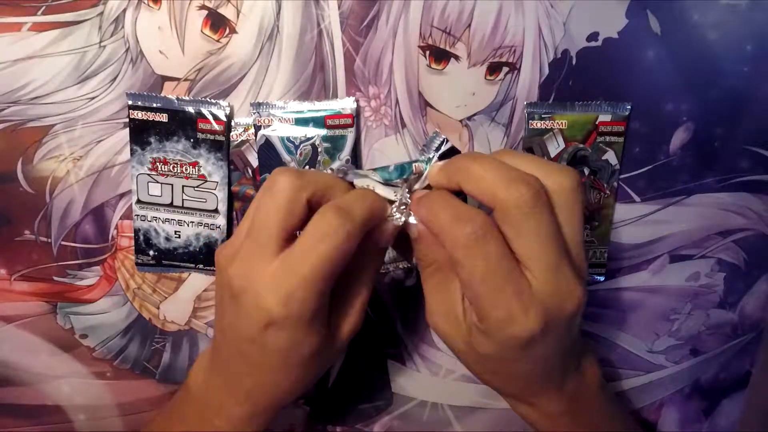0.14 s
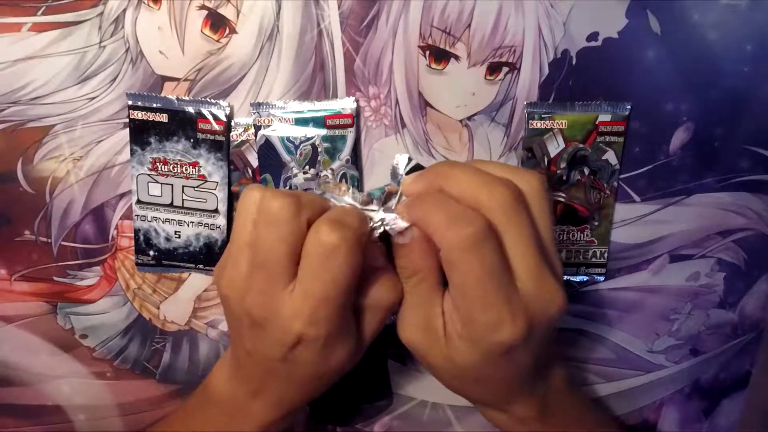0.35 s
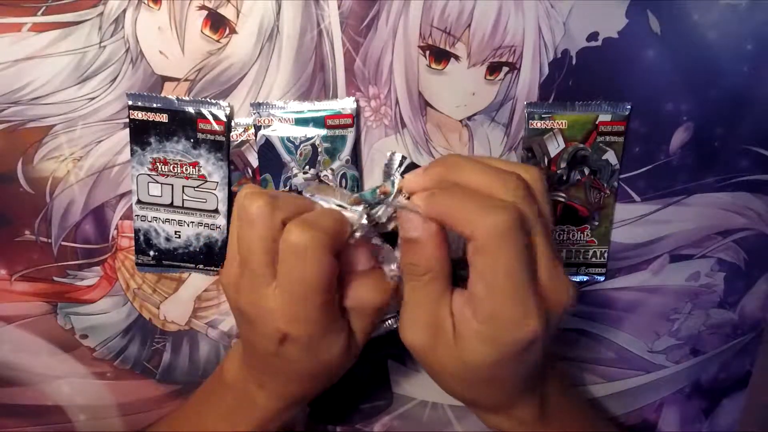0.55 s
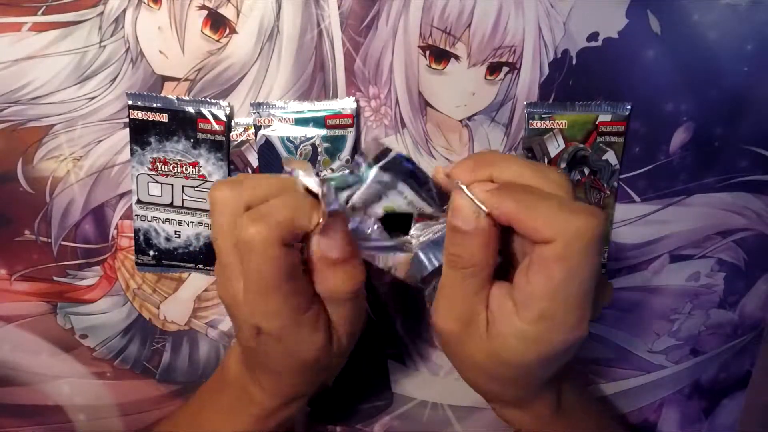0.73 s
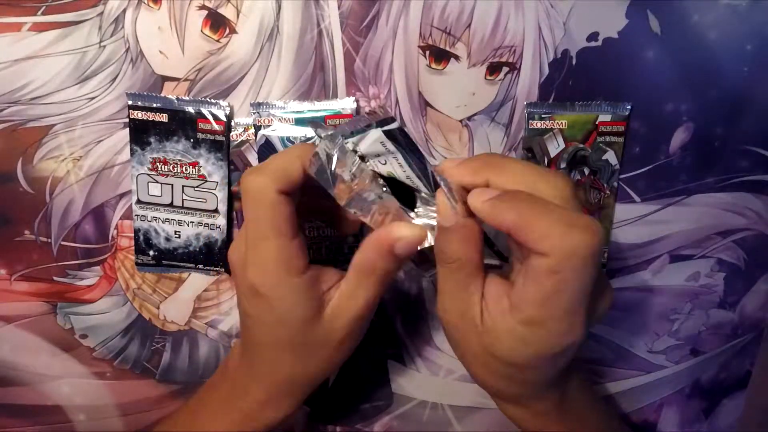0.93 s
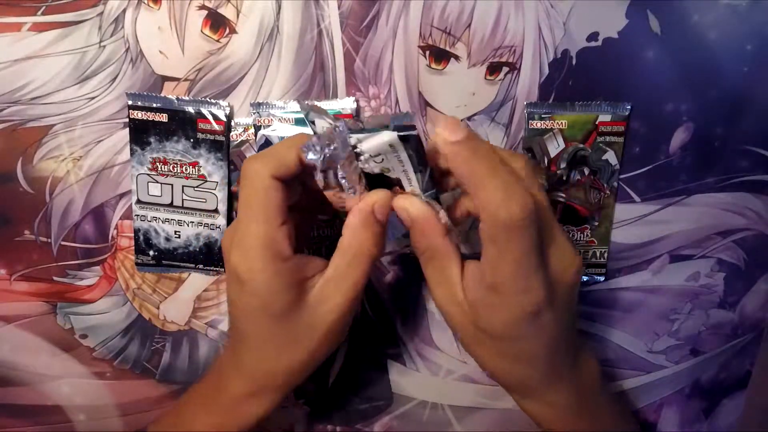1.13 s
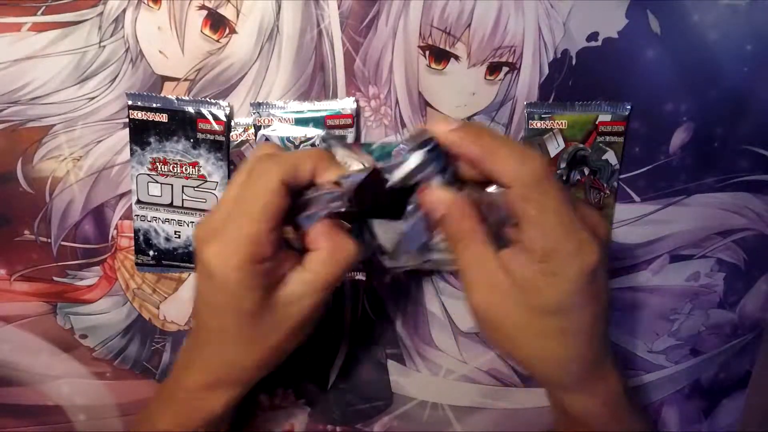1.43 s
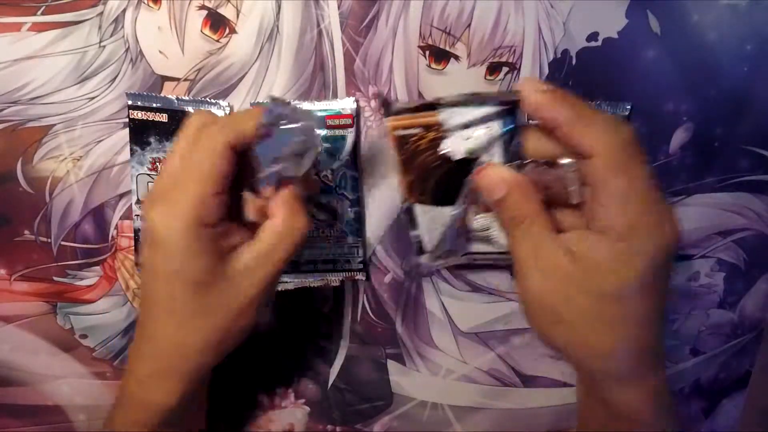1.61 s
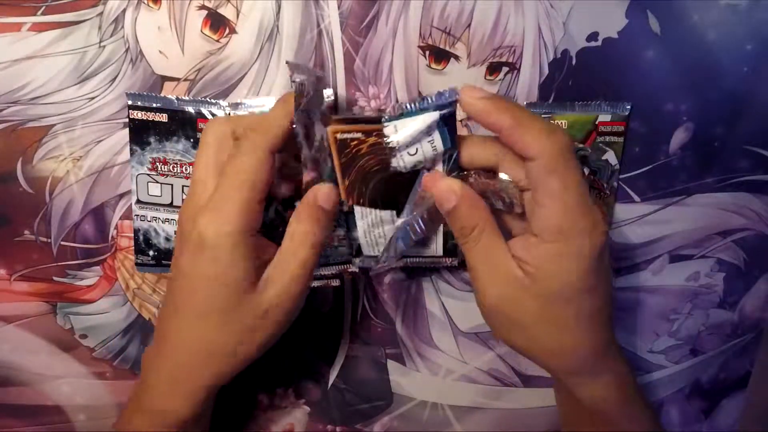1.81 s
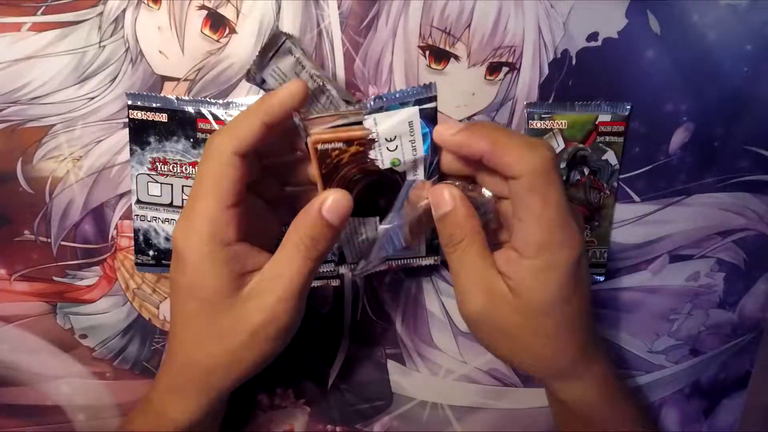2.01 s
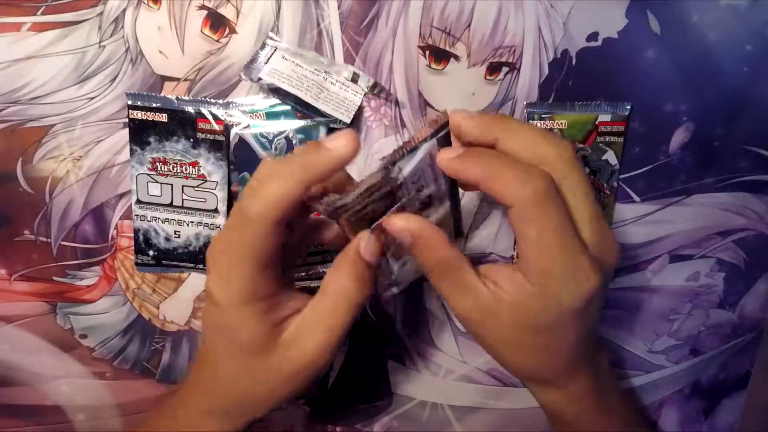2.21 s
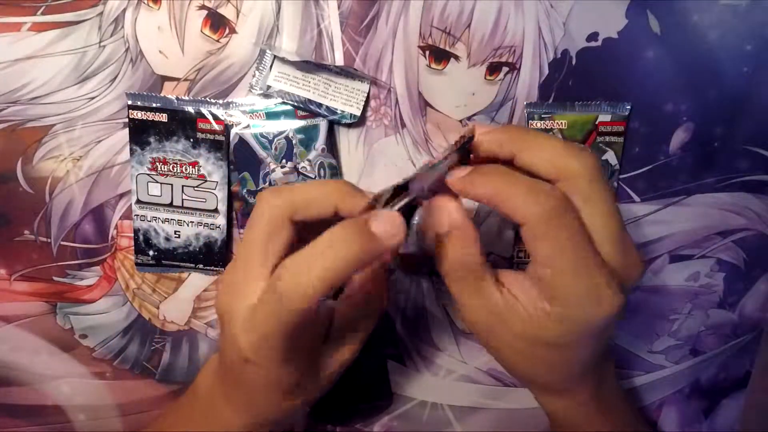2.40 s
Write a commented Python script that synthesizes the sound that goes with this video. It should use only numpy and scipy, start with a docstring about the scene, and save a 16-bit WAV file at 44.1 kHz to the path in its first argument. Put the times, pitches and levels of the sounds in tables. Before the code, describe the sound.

A foil trading card wrapper crackles close to the microphone, tears in a quick burst, crinkles on, rips again more sharply, then settles into sparse small ticks over a faint low room rumble.

```python
"""A foil card wrapper crinkles in two hands, is torn open in two rips and peeled off the cards, in a quiet room.
Creases buckle as single sharp snaps: a click and noise chatter through ring, crack, pop and sizzle bands.
Fine crackle, made of random damped ticks, runs under each flex and thickens where the seam tears.
The pack thuds softly as shaped noise and jolts as damped low sines.
A short room response of decaying noise answers, over a low steady rumble."""
import sys
import numpy as np
from scipy import signal
from scipy.fft import rfft, irfft, next_fast_len
from scipy.io import wavfile

SR = 44100
rng = np.random.default_rng(int(sys.argv[2]) if len(sys.argv) > 2 else 0)


def store_pcm(level_fs):
    """Save levels as 16-bit WAV."""
    pcm = np.round(np.clip(level_fs, -1, 1) * 32767).astype(np.int16)
    wavfile.write(sys.argv[1], SR, np.atleast_2d(pcm).T)


N = 112454


def amp(db):
    """Gain of a level in dB."""
    return 10 ** (np.asarray(db) / 20)


def unit(x):
    """x at rms 1."""
    return x / np.sqrt(np.mean(x ** 2) + 1e-20)


def along(points, hz):
    """Interpolate (Hz, value) points on a log frequency axis."""
    f, v = np.transpose(points)
    return np.interp(np.log(hz + 1), np.log(f + 1), v)


def coloured(x, points, tilt_db=0):
    """Minimum-phase filter of (Hz, dB) points, tilted about 2800 Hz; built by folding the cepstrum."""
    m = 2 * next_fast_len(len(x))
    hz = np.fft.rfftfreq(m, 1 / SR)
    gain_db = along(points, hz) + tilt_db * np.tanh(np.log((hz + 1) / 2800))
    cepstrum = irfft(np.log(amp(gain_db)))
    cepstrum[1:m // 2] *= 2
    cepstrum[m // 2 + 1:] = 0
    response = np.exp(rfft(cepstrum))
    return irfft(rfft(x, m) * response)[:len(x)]


def band(x, edges_hz, order=2):
    """A causal band of x at rms 1."""
    edges = np.clip(np.sort(edges_hz), 20, SR / 2 - 1)
    sos = signal.butter(order, edges, "band", fs=SR, output="sos")
    return unit(signal.sosfilt(sos, x))


def add(out, start_s, x):
    """Mix x into out at start_s."""
    i = max(round(start_s * SR), 0)
    out[i:i + len(x)] += x[:max(len(out) - i, 0)]


def stroke(length_s, rise, fall):
    """Linear rise, hold and release; rise and fall are shares of the length."""
    u = np.linspace(0, 1, max(int(length_s * SR), 64))
    return np.clip(np.minimum(u / rise, (1 - u) / fall), 0, 1)


GRAIN_HZ, GRAIN_DECAY_S = (750, 11500), 0.00018


def ticks(n, per_s, scatter_db):
    """Tiny slips at random times, each a damped cosine of random size, pitch and phase."""
    u = rng.random((int(n * per_s / SR) + 1, 4))  # columns: time, pitch, size, phase
    t = np.arange(SR // 400) / SR
    hz = GRAIN_HZ[0] * (GRAIN_HZ[1] / GRAIN_HZ[0]) ** u[:, 1:2]
    size = amp(scatter_db * np.sqrt(12) * u[:, 2:3] ** 2) * np.sqrt(hz)
    grains = size * np.exp(-t / GRAIN_DECAY_S) * np.cos(2 * np.pi * (hz * t + u[:, 3:]))
    at = (u[:, :1] * n).astype(int) + np.arange(len(t))
    return np.bincount(at.ravel(), grains.ravel(), minlength=n)[:n]


def crackle(strokes, colour, per_s, scatter_db, rise, fall):
    """Ticks of the foil swell and fade with each stroke of the hands."""
    out = np.zeros(N)
    for start_s, length_s, level_db, tilt_db in strokes:
        env = stroke(length_s, rise, fall)
        grains = unit(coloured(ticks(len(env), per_s, scatter_db), colour, tilt_db))
        add(out, start_s, amp(level_db) * env * grains)
    return out


# Foil flexes and slides. Each row: start in seconds, length in seconds, level in dB, treble tilt in dB.
FLEXES = [(0, 0.02351, -41, -2.5), (.19, 0.042, -49.5, 0), (.23, 0.08, -42.5, 4), (.3, 0.073555, -40, 4),
          (.39, 0.076, -48, -4), (.45, 0.05, -55, -8.5), (.73, 0.065, -43.5, -1), (.825, 0.045, -39, -1.5),
          (.94, 0.08, -45, -5.5), (.98, 0.073, -42, -0.5), (1.028, 0.041, -29.5, 5),
          (1.06, 0.056, -44.5, -0.5), (1.115, 0.022, -38.5, -11), (1.172, 0.089, -44, -8),
          (1.25, 0.06874, -48, -15), (1.49, 0.09808, -52.5, -3), (1.615, 0.0684, -42, 1),
          (1.72, 0.04, -53.5, 8), (1.8, 0.022, -45.5, -6.5), (1.92, 0.037, -50, -17),
          (1.97, 0.1044, -43.5, -2), (2.06, 0.056, -48.5, -2.5), (2.16, 0.06387, -54.5, -0.5),
          (2.225, 0.085, -44, -1.5), (2.378, 0.038, -47, -1), (2.44, 0.072, -48, -3.5)]
# Spectrum of flexed foil. Each row: frequency in Hz, gain in dB.
FLEX_COLOUR = [(150, -44), (250, -9.5), (468, -8), (845, 0), (1470, -9), (1730, -8.5), (2810, -4.5),
               (3910, -8.5), (5350, -2), (6360, -5), (7440, -14.5), (10700, -19.5), (11900, -40),
               (13900, -25), (16000, -21)]


def flexing():
    """Moderately dense slips while the foil bends and slides."""
    return crackle(FLEXES, FLEX_COLOUR, per_s=1500, scatter_db=4.4, rise=0.16, fall=0.36)


# Crackle of the foil merely held. Each row: time in seconds, level in dB.
GRIP_LEVEL = [(0, -57.5), (.3, -53), (1.3, -58), (1.8, -59), (2.35, -65.5), (2.55, -56)]


def grip():
    """Faint, even slips under the holding fingers, with the flexing spectrum."""
    level_db = np.interp(np.arange(N) / SR, *np.transpose(GRIP_LEVEL))
    return amp(level_db) * unit(coloured(ticks(N, per_s=1800, scatter_db=1), FLEX_COLOUR))


# Spectrum of the room at rest. Each row: frequency in Hz, gain in dB.
HUSH_COLOUR = [(20, -7.5), (45, -13.5), (70, -13), (108, -30.5), (135, 8.5), (180, 9), (300, 2.5),
               (460, -1), (820, -3), (1260, -6), (2000, -4), (3700, -23.5), (5500, -19), (10400, -19),
               (13600, -26), (16000, -43)]
HUSH_DB = -56.5


def hush():
    """Steady noise of the room at rest, strongest in the lows."""
    return amp(HUSH_DB) * unit(coloured(rng.standard_normal(N), HUSH_COLOUR))


# A crease buckles. Each row: start in seconds, level in dB, length in seconds, ring in Hz,
# ring over the crack in dB, low pop in dB, sizzle in dB.
SNAPS = [(0.0083, -28, 0.0011, 3740, -19, -5.5, -25.5), (0.06, -36.5, 0.00069, 2370, 11, -9.5, -15),
         (0.134, -39, 0.0017, 4170, -2, -16, -31.5), (0.163, -25.5, 0.0016, 1300, -3.5, -14, -11.5),
         (0.2055, -28.5, 0.001476, 5530, 6, -26, -0.5), (0.2242, -23.5, 0.00098, 5760, 8, -15.5, -16.5),
         (0.2268, -19, 0.0012, 4800, -2.5, -22.5, -20), (0.2315, -20, 0.0022, 2040, -0.5, -7.5, -12),
         (0.2655, -38, 0.0019, 5320, -1, -26, -9), (0.271, -36, 0.001492, 5580, 6, -10, -9),
         (0.277, -32, 0.0011, 4610, 3, -23.5, 3), (0.296, -32.5, 0.0022, 2110, -2, -17, -12),
         (0.3079, -26, 0.0014, 2150, 0, -31, -22), (0.3157, -33, 0.0012, 2100, 1, -17, -18),
         (0.3329, -17.5, 0.0009262, 5409, 3.5, -19, -18), (0.371, -38, 0.0012, 5103, 11.5, -27, -11),
         (0.3773, -37, 0.001, 5460, -12, -23, -27), (0.4003, -25, 0.00112, 4657, -4, -31, -22),
         (0.4234, -37, 0.0014, 3360, -9, -21, -21.5), (0.4247, -44, 0.00178, 4981, -7, -5, -18),
         (0.4506, -34, 0.00093, 2224, -3, -7, -12), (0.4539, -34.5, 0.00083, 6022, 3, -15, -8),
         (0.4593, -21, 0.001, 1940, 6.5, -13, -14), (0.4909, -32, 0.00059, 4520, -23.5, -29.5, -10),
         (0.502, -23, 0.00092, 3113, -8.5, -29, -20), (0.5052, -22.5, 0.0007135, 6224, -1.5, -25, -9),
         (0.51, -18.5, 0.001, 4830, 0, -11, -22), (0.5182, -21, 0.000958, 2872, -4, -12, -11.5),
         (0.5337, -25, 0.00062, 5300, 8, -20, -18), (0.5358, -33, 0.001216, 1713, -3, -3, -25),
         (0.5478, -20, 0.0008398, 2115, -3, -8.5, -15), (0.556, -21, 0.00074, 5378, -6.5, -22, -16),
         (0.5574, -21.5, 0.0008764, 3500, -5.5, -8.5, -19.5), (0.5631, -14, 0.0014, 5140, 0, -12, -14),
         (0.5717, -23, 0.0023, 5557, 2, -10, -12), (0.5834, -25, 0.0005714, 3436, 1, -18, -18),
         (0.592, -21.5, 0.001, 2960, 1, -6, -21.5), (0.6029, -21, 0.00067, 2400, 6, -5, -22),
         (0.6077, -17, 0.0015, 5100, -1.5, -12.5, -15), (0.6136, -25, 0.0007, 1470, 3, -1, -24),
         (0.624, -25.5, 0.0006326, 2194, -1, -3, -22), (0.6324, -27.5, 0.0011284, 2370, 2, 4, -20.5),
         (0.639, -32, 0.0016, 5660, 11, -3.5, -5.5), (0.717, -32.5, 0.00051, 3304, -11, -15.5, -10.5),
         (0.7216, -38, 0.0005, 4901, 8, -11.5, -16), (0.7347, -23, 0.002, 4970, -5.5, -7, -12.5),
         (0.751, -25.5, 0.002, 4630, 5, -13, -15), (0.7718, -25, 0.0006503, 2830, -15, -18.5, -12.5),
         (0.781, -44, 0.0019, 1880, 8.5, -17, -23), (0.811, -30.5, 0.00089, 5700, 8.5, -35.5, -26.5),
         (0.8328, -36, 0.002, 1289, 15.5, -3.5, -24), (0.8365, -34, 0.0011, 1920, 3, -10, -23),
         (0.847, -30, 0.002082, 3036, -1, -3, -14.5), (0.8571, -33.5, 0.00078, 1314, -23, -2, -31),
         (0.879, -41.5, 0.0012, 2206, 3, -2, -22), (0.9042, -36, 0.0002144, 3382, -1, -27, -16),
         (0.9285, -27.5, 0.00076, 1340, -3, -6, -19), (0.9509, -35.5, 0.001611, 2790, 1, -12, -26),
         (0.9565, -29.5, 0.0011, 4740, -3, -17.5, -14), (0.979, -31.5, 0.0027, 1652, 2, -19, -11),
         (0.9855, -33, 0.0019, 5273, 0, -20, -10), (0.9957, -32, 0.000845, 2130, 3, -17, -8),
         (0.9996, -26.4, 0.00043, 4882, 6, -30, -19.5), (1.006, -29.5, 0.0015, 5181, -6.5, -27.5, -18),
         (1.015, -36.5, 0.0017, 2000, 2.5, -5, -16.5), (1.0248, -27.5, 0.0012, 4050, 1, -5, -6),
         (1.0343, -33, 0.001085, 5018, -4, -24, -19), (1.0431, -28, 0.00072, 6170, -2.5, -17.5, -10),
         (1.0475, -21.5, 0.0011, 5100, 19, -8, -10), (1.0558, -24.5, 0.00074, 5113, 7, -25, -14.5),
         (1.084, -41, 0.001473, 2860, 14, 3, -15), (1.102, -35, 0.0008937, 5900, 0, -8, -20),
         (1.119, -25.5, 0.00047, 5358, 9, -27, -8.5), (1.1229, -20.5, 0.00098, 5833, 4, -10, -13.5),
         (1.14, -37, 0.0006, 5000, -11, -8, -24.5), (1.145, -33.5, 0.0012415, 2300, -10, -18, -27),
         (1.1632, -38, 0.0011, 1870, 18, -16, -30), (1.1738, -26.5, 0.0015, 2580, 10, -9.5, -15),
         (1.176, -24, 0.00092, 5443, 4, -27, -23), (1.1916, -35, 0.0017, 3040, -11, -11, -16),
         (1.1961, -27, 0.00087, 3213, 3.5, -9, -23.5), (1.2, -33.5, 0.001428, 1310, -9, 4, -26),
         (1.2094, -32, 0.00066, 5244, 6.5, -21, -19), (1.218, -18.5, 0.00058, 4700, 5.5, -29, -20),
         (1.2265, -28, 0.002648, 2940, 10.5, -10, -12), (1.2501, -25.5, 0.00047, 6000, 5, -24, -19),
         (1.2545, -23.5, 0.0006, 5161, 3.5, -15, -13), (1.2587, -26, 0.0013, 1370, 0, -17, -21),
         (1.2781, -25, 0.00087, 2316, 4, -20, -27), (1.2878, -24, 0.0013, 1650, 4.5, -27.5, -23),
         (1.312, -21.5, 0.0015, 800, -1, -3.5, -16), (1.33, -33.5, 0.0018, 5750, -0.5, -14, -18),
         (1.344, -36, 0.0016, 1344, -2.5, -21, -23), (1.3817, -43, 0.000928, 1686, 12, -14, -23),
         (1.3872, -23, 0.0014, 4630, -12, -12, -16), (1.395, -19.5, 0.0016086, 5450, -8, -5, -4.5),
         (1.4015, -16.5, 0.0015, 5606, 2, -2, -16), (1.4058, -24.5, 0.00033, 3500, -9.5, -2, -16.5),
         (1.409, -28, 0.00099, 2100, -2, -9, -10), (1.4122, -15, 0.0017, 5340, 4, -9.5, -16),
         (1.4207, -18.5, 0.0014, 1930, 1, -8.5, -24), (1.439, -13.5, 0.0007, 2000, 15, -12.5, -27),
         (1.446, -30, 0.00097, 4800, -9, -8, -17), (1.449, -28, 0.0019, 1827, -5, -17, -17.5),
         (1.4537, -36, 0.0007, 1900, 0, -6, -15.5), (1.4651, -25.5, 0.002, 5000, 5, -15.5, -12.5),
         (1.5268, -38.5, 0.00073, 5250, -24.5, -1, -13), (1.5583, -38, 0.0014, 4370, -8, -15, -22),
         (1.5693, -37, 0.00092, 4131, 13, -3.5, -7), (1.603, -30, 0.0011, 5103, 10, -11, -7),
         (1.6291, -32, 0.00065, 2725, -1, -20.5, -12), (1.6558, -29, 0.0005, 4200, 1, -2.5, -9),
         (1.677, -37.5, 0.0011, 5363, 0, -25.5, -7), (1.694, -30.5, 0.0018, 5945, 4, -19, -5),
         (1.726, -42, 0.00072, 3071, 0, -17.5, -22.5), (1.806, -39.5, 0.0023, 4684, -6, -13, -26.5),
         (1.8363, -38, 0.00036, 5560, 12.5, -19, -19), (1.8638, -42, 0.00086, 5200, -3, -14.5, -10),
         (1.882, -34, 0.000543, 4080, 6, -25.5, -19), (1.9155, -27.5, 0.0012, 5130, 2.5, -7, -14),
         (1.944, -43, 0.00066, 1310, 20, 5, -17), (1.975, -33.5, 0.0024, 3300, -2, -10, -29),
         (1.991, -43, 0.0026, 5080, -11.5, 0, -14), (1.9989, -34.5, 0.000782, 5201, 9, -13, -18.5),
         (2.013, -37, 0.002118, 5540, 1, -28, -19), (2.0225, -34, 0.00078, 5590, 3, -14, -26.5),
         (2.0366, -24.5, 0.00065, 5200, 23, -13, -19.5), (2.051, -28.5, 0.002, 4941, 1.5, -16, -14),
         (2.0888, -39, 0.00049, 5314, 10.5, -9, -21.5), (2.174, -42.5, 0.0005, 5895, 15, -20, -20),
         (2.224, -41.5, 0.001719, 1900, -3, 0, -7), (2.255, -38, 0.00096, 5060, 2.5, -7, -6.5),
         (2.2718, -37.5, 0.0017, 2550, 7, -8, -13), (2.382, -42, 0.0015, 5963, 14, -16, -23),
         (2.395, -44, 0.0031, 6196, 0.5, -3.5, -5), (2.4588, -37.5, 0.00088, 2650, 0, -28, -10),
         (2.476, -33.5, 0.0011, 5830, 24, -8, -14), (2.5208, -29, 0.00082, 2400, 2, -17, -2),
         (2.5421, -28, 0.00025, 5300, 27, -40, -26)]
RING_WIDTH_HZ, RING_WIDENS = 540, 0.15  # heavily damped facet: bandwidth grows with pitch
LEVEL_OVER_S = 0.003  # a snap's level is its rms over this time
CHATTER, CHATTER_LIFE = 1.23, 1  # strength of the tiny slips beside the click; life over snap length
LEAD_S, LEAD_DB = 0.0018, -14.5  # creak before the flip; level under the slips
POP_HZ, CRACK_HZ, SIZZLE_HZ = (714, 1374), (1660, 5860), (7127, 10320)
BODY_HZ, BODY_DB = (235, 656), -15.5  # the whole pack moves; level under the pop


def snaps():
    """Each crease creaks, then flips with a click and brief chatter that ring its facet."""
    out, t = np.zeros(N), np.arange(SR // 50) / SR
    for start_s, level_db, length_s, ring_hz, ring_db, pop_db, sizzle_db in SNAPS:
        u = np.maximum(t - LEAD_S, 0) / max(CHATTER_LIFE * length_s, 1 / SR)
        slips = unit(rng.standard_normal(len(t)) * np.sqrt(u) * np.exp(-u))
        creak = unit(rng.standard_normal(len(t)) * t * (t < LEAD_S))
        push = CHATTER * (slips + amp(LEAD_DB) * creak) / np.sqrt(len(t))
        flip = int(np.clip((LEAD_S + length_s / 3) * SR, 0, len(t) - 1))
        push[flip] += rng.choice([-1, 1])

        width_hz = RING_WIDTH_HZ + RING_WIDENS * ring_hz
        ring = band(push, (ring_hz - width_hz / 2, ring_hz + width_hz / 2))
        crack = unit(amp(ring_db) * ring + band(push, CRACK_HZ, order=4))
        pop = band(push, POP_HZ, order=3) + amp(BODY_DB) * band(push, BODY_HZ, order=3)
        sizzle = band(push, SIZZLE_HZ)
        snap = unit(crack + amp(pop_db) * pop + amp(sizzle_db) * sizzle)
        add(out, start_s - LEAD_S, amp(level_db) * snap * np.sqrt(LEVEL_OVER_S / t[-1]))
    return out


# The pack thuds in the fingers. Each row: start in seconds, length in seconds, level before colouring in dB.
THUDS = [(.13, 0.1399, -56.5), (.31, 0.06173, -53), (.5, 0.0485, -51), (.55, 0.1, -43), (.73, 0.02, -47.5),
         (0.837, 0.058, -48.5), (0.979, 0.041, -48), (1.012, 0.09, -48), (1.18, 0.09594, -55),
         (1.398, 0.062, -37.5), (1.437, 0.06, -41.5), (1.49, 0.16, -51.5), (1.64, 0.037, -48),
         (1.905, 0.0685, -50), (1.97, 0.13, -51.5), (2.423, 0.069, -61)]
# Spectrum of the pack. Each row: frequency in Hz, gain in dB.
PACK_COLOUR = [(30, -36), (60, -28), (105, -40), (135, -6.5), (190, 1), (280, -6.5), (450, -11.5),
               (1000, -12.5), (4000, -57.5)]


def thuds():
    """The stiff pack gives a dull flutter of low noise when it is tugged."""
    out = np.zeros(N)
    for start_s, length_s, level_db in THUDS:
        env = stroke(length_s, rise=0.066, fall=0.51)
        add(out, start_s, amp(level_db) * env * rng.standard_normal(len(env)))
    return out.std() * unit(coloured(out, PACK_COLOUR))  # colouring keeps the overall level


# The seam tears. Each row: start in seconds, length in seconds, level in dB, treble tilt in dB.
RIPS = [(.51, 0.04472, -37.5, -6.5), (.556, 0.033, -30, -2), (.59, 0.05547, -28.5, -1.5),
        (1.394, .028, -21, 4), (1.417, 0.056, -27.5, 1.5)]
# Spectrum of tearing foil. Each row: frequency in Hz, gain in dB.
RIP_COLOUR = [(150, -30.5), (250, -6), (336, -29), (557, -15), (723, -5), (988, -1), (1730, -5), (2050, 4),
              (2490, -4), (3910, -9), (5630, -3), (7500, -19.5), (10700, -18), (12000, -36), (15000, -33.5)]


def tearing():
    """Dense slips as the seam gives way."""
    return crackle(RIPS, RIP_COLOUR, per_s=4000, scatter_db=4.4, rise=0.15, fall=0.29)


# The stack of cards jolts as the foil gives. Each row: start in seconds, peak before colouring in dB.
KNOCKS = [(0.881, -42), (0.9095, -36.5), (1.401, -30), (1.4815, -39.5)]
KNOCK_HZ, KNOCK_T60_S, KNOCK_ATTACK_S = 176.5, 0.044, 0.00251


def knocks():
    """Each jolt gives one firm, low, quickly damped note."""
    out, t = np.zeros(N), np.arange(SR // 5) / SR
    env = amp(-60 * t / KNOCK_T60_S) * (1 - np.exp(-t / KNOCK_ATTACK_S))
    note = env / env.max() * np.sin(2 * np.pi * KNOCK_HZ * t)
    for start_s, peak_db in KNOCKS:
        add(out, start_s, amp(peak_db) * note)
    return coloured(out, PACK_COLOUR)


# Decay of the room. Each row: frequency in Hz, time to fall 60 dB in seconds.
ROOM_T60 = [(200, 0.26), (1500, 0.26), (6000, 0.24), (14000, 0.17833)]
# Level of the diffuse tail. Each row: frequency in Hz, gain in dB.
ROOM_SEND = [(200, -17.5), (1200, -12.5), (2500, -14.5), (6000, -18.5), (14000, -10.5)]
WALL_S, WALL_DB = 0.011, -20.5  # first reflection


def room(x):
    """A first wall reflection and a short diffuse tail of noise, each frequency decaying at its own rate."""
    hz, t, z = signal.stft(rng.standard_normal(SR // 2), SR, nperseg=256)
    fade = amp(-60 * t / along(ROOM_T60, hz)[:, None])
    onset = 1 - np.exp(-t / 0.0008)
    tail = signal.istft(z * fade * onset, SR, nperseg=256)[1]
    response = coloured(tail / np.linalg.norm(tail), ROOM_SEND)
    add(response, WALL_S, amp([WALL_DB]))
    return signal.fftconvolve(x, response)[:N]


def scene():
    """The wrapper and pack, direct and through the room, over its hush."""
    foil = flexing() + grip() + snaps() + tearing()
    hands = foil + thuds() + knocks()
    return (hands + room(hands) + hush())[None]


CEILING, CEILING_KNEE = 0.6, 5  # full scale = 1; a higher knee bends later and harder
TOP_HZ = 15500


def record(dry):
    """The microphone rounds off the tallest peaks; nothing from TOP_HZ up passes."""
    soft = dry / (1 + np.abs(dry / CEILING) ** CEILING_KNEE) ** (1 / CEILING_KNEE)
    m = next_fast_len(N + SR // 2)
    passed = np.fft.rfftfreq(m, 1 / SR) < TOP_HZ
    return irfft(rfft(soft, m) * passed, m)[:, :N]


dry = scene()
out = record(dry)
store_pcm(out)
```